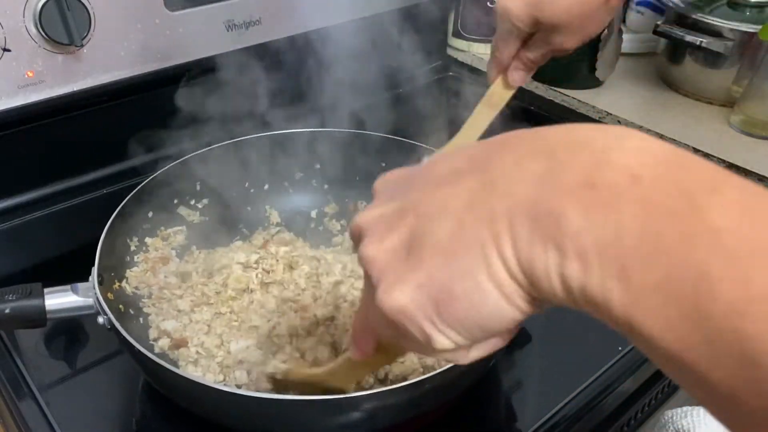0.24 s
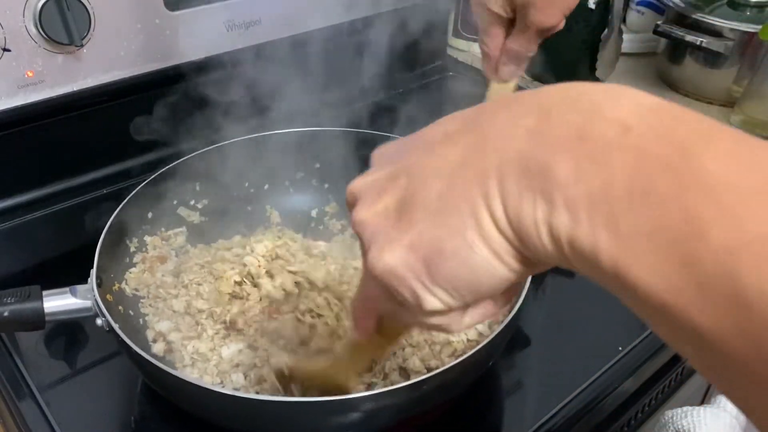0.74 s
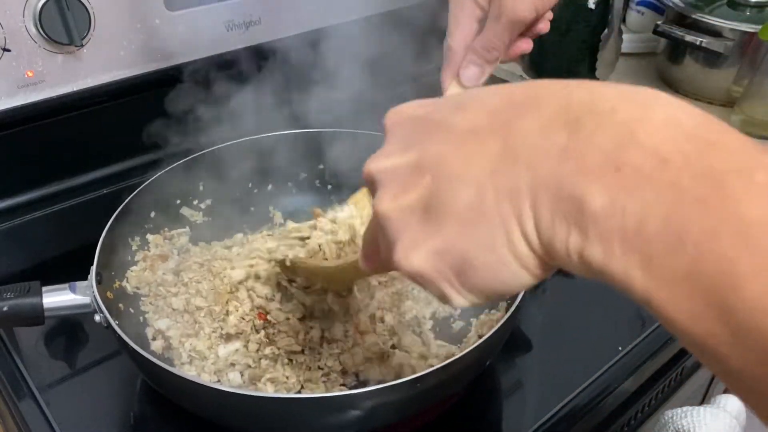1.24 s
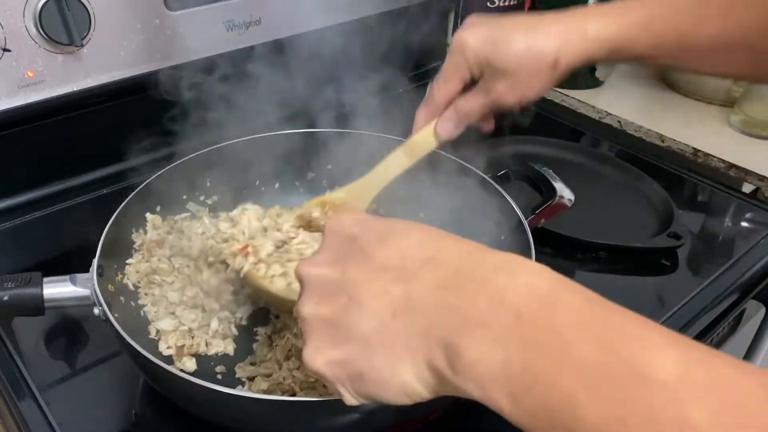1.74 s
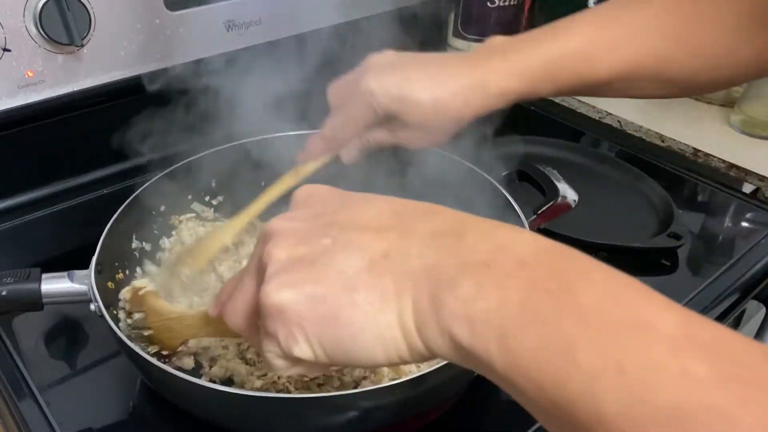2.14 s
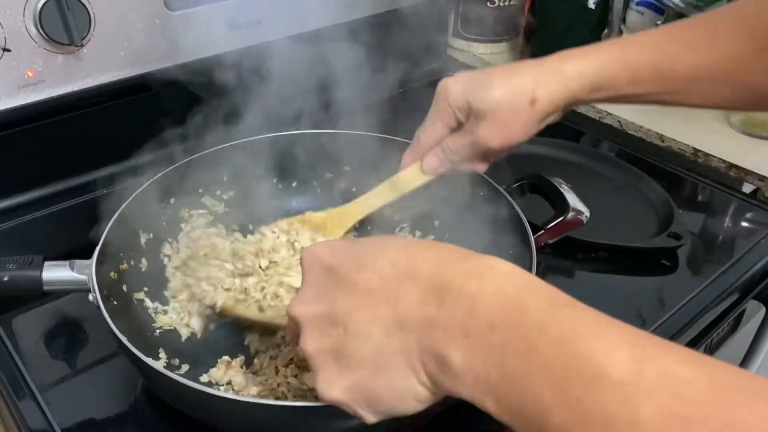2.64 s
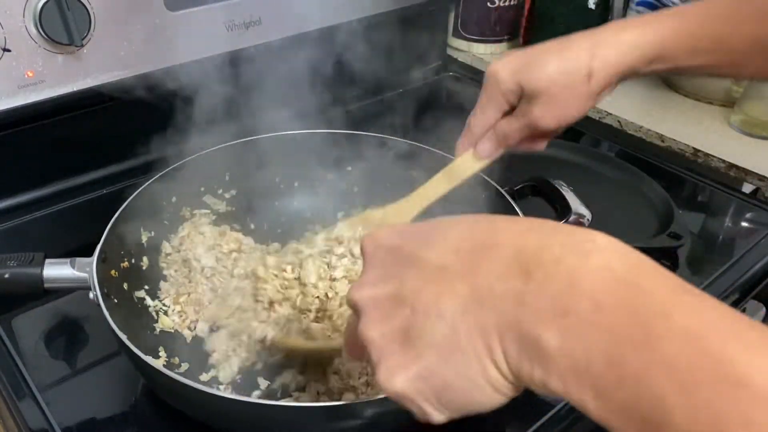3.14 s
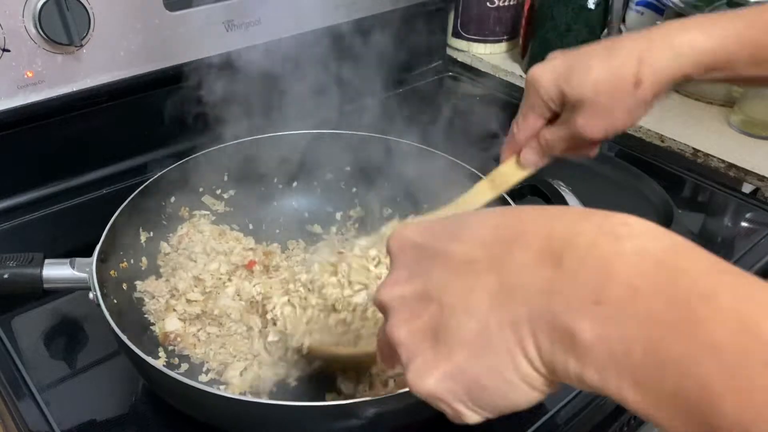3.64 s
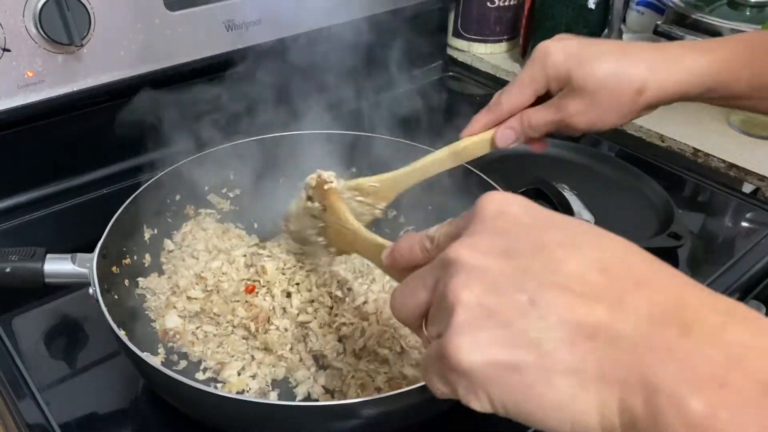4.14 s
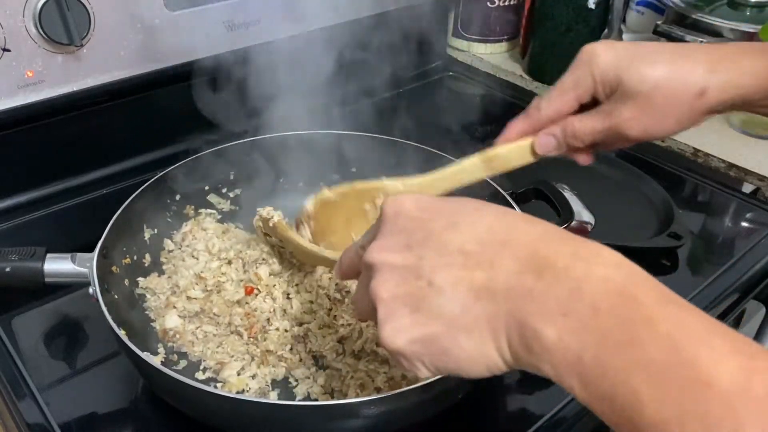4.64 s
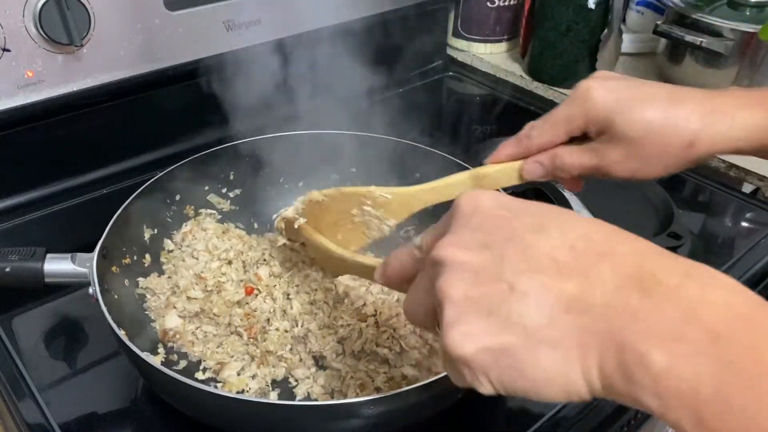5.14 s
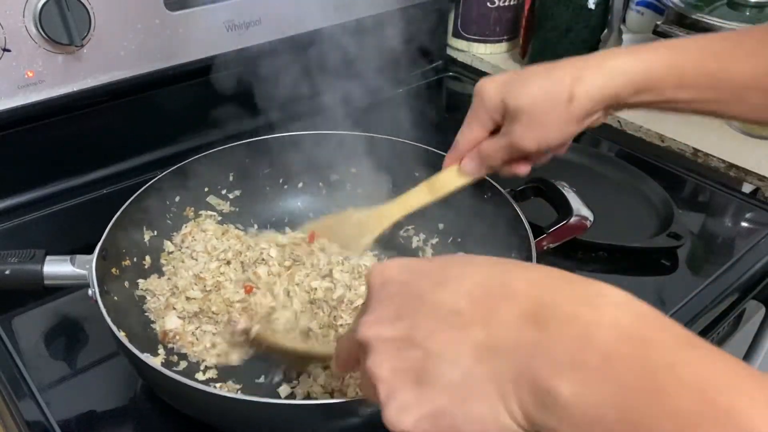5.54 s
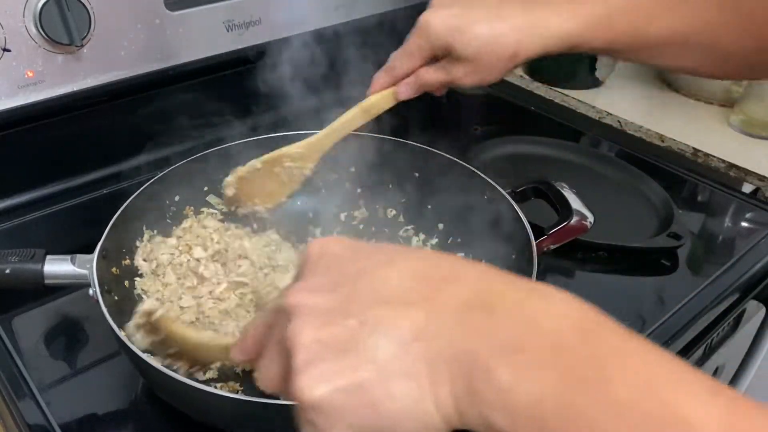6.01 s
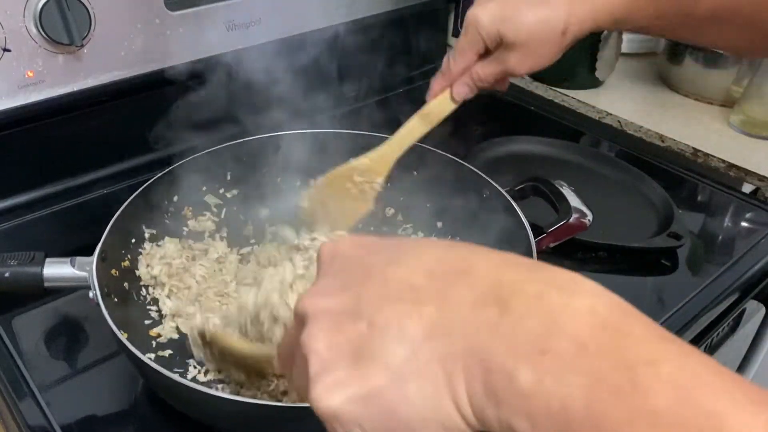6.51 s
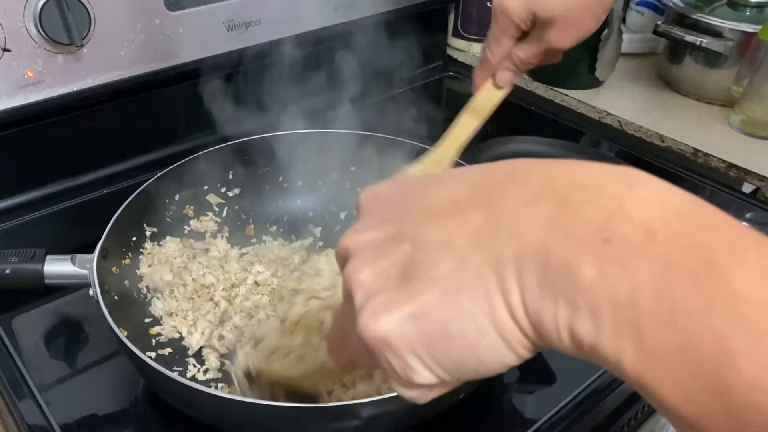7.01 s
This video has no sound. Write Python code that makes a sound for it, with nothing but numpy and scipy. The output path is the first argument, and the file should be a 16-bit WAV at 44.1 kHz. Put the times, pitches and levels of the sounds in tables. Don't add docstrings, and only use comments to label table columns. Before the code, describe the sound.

Shredded meat fries with a dense steady sizzle in a wide pan while two wooden spatulas knock on the metal, each push making the fizz swell.

```python
import sys
import numpy as np
from scipy import signal
from scipy.fft import rfft, irfft, next_fast_len
from scipy.io import wavfile
from scipy.ndimage import uniform_filter1d

SR = 44100
rng = np.random.default_rng(int(sys.argv[2]) if len(sys.argv) > 2 else 0)


def volts_from_decibels(level):
    exponent = np.asarray(level, float) / 20
    return 10 ** exponent


def master_out(mix):
    frames = np.transpose(np.atleast_2d(mix))
    ceiling = np.clip(frames, -1, 1)
    pcm = np.round(ceiling * 32767).astype(np.int16)
    wavfile.write(sys.argv[1], SR, pcm)


N = 320586
SIZE = next_fast_len(N + SR)
HZ = np.arange(SIZE // 2 + 1) * SR / SIZE

# [start_s, simmer_db, spray_over_simmer_db]
SIMMER = [(0, -52.5, -1), (.15, -46, -5), (.6, -46.5, -4), (1.25, -46.5, -11.5), (1.75, -50, -3),
          (2.05, -49.5, -11), (2.75, -50.5, -4), (3.3, -53, -0.5), (3.75, -51, -2), (4.0, -47, -8),
          (4.6, -46.5, -9), (5.3, -46.5, -7.5), (5.7, -51.5, 0.5), (6.05, -47.5, -6), (6.42, -47, -10),
          (6.8, -53.5, -2.5), (6.95, -48, -3.5), (7.27, -50, -1.5)]
# [peak_s, swell_db, length_s, extra_spray_db]
STROKES = [(0.177, 3, 0.084, -3.5), (0.351, 8.5, 0.11, -2.5), (0.675, 4, 0.045, -1.5), (0.973, 7, .2, 1.5),
           (1.48, 9, 0.2, -4), (1.87, 2.5, 0.084, -1), (2.17, 10, 0.22, 0), (2.535, 7.5, 0.17, -5),
           (2.976, 6.5, 0.042, -3), (3.076, 10.5, 0.16, -5), (3.466, 7.5, 0.052, -3.5),
           (3.605, 12.5, 0.2, -8.5), (3.89, 4, 0.14, 0), (4.428, 3, 0.042, 0), (5.497, 14, .13, -7.5),
           (5.9, 4.5, .1, -1), (6.125, 8, .14, -1), (6.58, 12, 0.15, -3.5), (7.094, 9, .2, -4.5)]
# [freq_hz, level_db]
FIZZ_SPECTRUM = [(300, -36), (900, -11), (1500, -1), (2200, 1), (3000, -1.5), (5000, -2), (7000, -7),
                 (9000, -13.5)]
SPRAY_SPECTRUM = [(5000, -7), (7500, 0), (9500, 2.5), (11000, -3), (12500, -14), (14500, -4.5),
                  (16000, -7.5)]
SCRAPE_SPECTRUM = [(120, -20), (300, -4.5), (520, -6), (700, -1), (1100, -7), (1600, -3.5), (3000, -53)]
RUMBLE_SPECTRUM = [(25, -29), (45, -4), (64, 0), (100, 0), (160, -8), (250, -15.5), (500, -31)]
STEAM_SPECTRUM = [(8000, -30), (10000, -14), (12300, -14), (14000, -2), (16000, -3)]
# [start_s, level_db, pitch_hz]
SPITS = [(0.082, -35.5, 1530), (0.315, -43, 1530), (1.441, -29, 2460), (1.966, -42, 2040),
         (2.885, -39, 1500), (2.9693, -38, 1830), (3.5164, -44, 1650), (3.5463, -39, 2280),
         (3.5708, -30, 6040), (4.2894, -36, 2220), (4.3862, -33, 1470), (4.5997, -38, 3580),
         (4.6522, -27, 2240), (4.673, -35, 1440), (4.7164, -32, 1600), (4.7187, -30.5, 5500),
         (4.7596, -31, 5030), (4.7994, -38, 4000), (4.8521, -30, 1630), (4.856, -32, 1700),
         (4.8755, -33, 6500), (4.8882, -33, 2240), (5.1267, -31.5, 1950), (5.139, -40, 2100),
         (5.2828, -35, 1450), (6.5534, -29, 1220), (6.8418, -48, 1620)]
# [start_s, rim_db, rim_pitch_hz, crack_over_rim_db]
KNOCKS = [(.2, -26.5, 1900, -3.5), (.206, -26.5, 995, -30), (.724, -23, 840, -3.5), (.824, -49, 931, -13),
          (1.031, -53, 1210, -9), (1.382, -44.5, 1473, 0), (2.042, -31.5, 990, -6), (2.116, -42, 1470, -1),
          (2.409, -33, 1410, -17), (2.43, -23, 1980, 1.5), (2.635, -34.5, 1140, -10),
          (5.344, -15.5, 1030, -5.5), (5.385, -15.5, 1110, -10.5), (6.073, -23, 1340, -4.5),
          (6.216, -46, 1180, 3), (6.339, -32, 724, -5), (6.499, -29.5, 1390, -6), (7.002, -16.5, 1075, -6),
          (7.089, -31, 1180, -23)]
# [start_s, level_db, pitch_hz]
TAPS = [(.2, -32, 738), (.335, -35, 190), (1.387, -37, 470), (.73, -45, 850), (2.43, -20.5, 600),
        (5.387, -18.5, 1230), (6.499, -23.5, 420), (.824, -32.5, 414), (2.042, -42, 790),
        (2.409, -37, 1360), (2.635, -30.5, 1140), (2.636, -32.5, 600), (6.339, -37, 900), (3.99, -44, 342),
        (5.346, -31, 1740), (7.003, -27, 1620), (7.005, -21.5, 1030), (7.09, -32, 900), (3.456, -37, 716),
        (3.502, -38.5, 420), (3.503, -38, 720), (3.516, -33.5, 1800), (3.668, -38.5, 800),
        (4.227, -43.5, 413), (4.963, -44.5, 452), (6.007, -41.5, 160), (6.008, -42.5, 330)]
# [start_s, bottom_db, wall_over_bottom_db, wall_pitch_hz, hob_over_bottom_db]
THUMPS = [(.204, -28.5, -1, 600, -11), (.263, -28.5, -5, 290, -16), (0.726, -28, -1, 500, -12.5),
          (0.823, -30, -7.5, 290, -14), (1.031, -31.5, -7.5, 362, -13.5), (1.376, -29.5, -7.5, 415, -8),
          (2.042, -22.5, -6, 350, -19), (2.113, -28.5, -11, 352, -17), (2.408, -23, -7.5, 334, -19.5),
          (2.43, -25, -0.5, 450, -28), (2.635, -24, -4, 328, -15), (3.002, -43.5, -20, 336, -4.5),
          (3.314, -43.5, -9, 325, -7), (3.505, -41, -1, 477, -4.5), (3.914, -50.5, -1, 478, 5),
          (5.344, -26, -3, 493, -4.5), (5.386, -23.5, 1, 331, -16), (6.074, -13.5, -6.5, 344, -19),
          (6.215, -30, -0.5, 342, -8.5), (6.34, -23, -1.5, 333, -16.5), (6.361, -40, -21, 361, -31),
          (6.498, -32.5, 11, 450, -12), (7, -23.5, -1, 474, -11), (7.09, -25.5, -1, 328, -10)]
# [freq_hz, level_db, t60_s]
RIM_MODES = [(735, -5, 0.036), (820, 4, 0.056), (900, 6, 0.04), (1006, -1.5, 0.11), (1116, 3.5, 0.031),
             (1234, -1, 0.07), (1360, -29, 0.044), (1746, -1, 0.071), (2120, -9, 0.054), (2007, 9, 0.039),
             (2613, 7, 0.063), (3330, -11, .04), (4560, 3, 0.03)]
WALL_MODES = [(290, -7, 0.16), (331, -6, 0.19), (361, -3.5, 0.17), (424, -2.5, 0.08), (475, -3.5, 0.14),
              (555, -1.5, 0.13), (630, 5.5, 0.029)]
BOTTOM_MODES = [(134, -8.5, 0.15), (152.2, -7.5, 0.16), (163.4, -0.5, 0.14), (181.4, -4, 0.076),
                (208.7, -5.5, 0.2), (250, -14.5, 0.16)]
HOB_MODES = [(64.4, -5.5, 0.44), (98, 0.5, 0.12), (81, -6.5, 0.18)]
# [freq_hz, level_db]
CLACK_SPECTRUM = [(250, -7), (500, 10), (1000, -19), (1500, 10), (2500, -36), (5000, -63)]
CRACK_SPECTRUM = [(500, -3), (1000, 10), (1350, -7.5), (2000, 5.5), (3200, -3.5), (5000, -3), (8000, -18.5),
                  (15000, -31)]
THUD_SPECTRUM = [(120, -34), (280, 6), (500, 8), (700, -2), (1400, -66)]
# [freq_hz, share_heard_alike_0_to_1, left_minus_right_db]
PORTS = [(60, 0.97, 0.5), (177, 0.95, 1.5), (400, 0.64, -3), (600, 0.25, 3.5), (1250, 0.51, 2),
         (2460, 0.2, 3), (4000, 0, 4.5), (5840, 0.41, 7), (7100, 0.26, 1.5), (8040, 0.7, 0.5),
         (12800, 1, -1), (16000, 0.4, 1)]
# [freq_hz, left_lead_rad]
PORT_LEAD = [(0, 0), (1300, .1), (2800, 2.1), (4300, -.5), (6700, 0), (8430, -np.pi), (15690, -5 * np.pi),
             (22050, -8.5 * np.pi)]


def on_hz(hz, values):
    return np.interp(np.log(HZ + 1), np.log(hz), values)


def colour(x, spectrum):
    gain = volts_from_decibels(on_hz(*np.transpose(spectrum)))
    y = irfft(rfft(x, SIZE) * gain, SIZE)[..., :N]
    return y / np.sqrt(np.mean(y ** 2))


def noise():
    return rng.standard_normal((3, N))


def add(out, start_s, x):
    i = int(start_s * SR)
    out[:, i:i + x.shape[1]] += x[:, :N - i]


def walk(rate_hz):
    hold = int(SR / rate_hz)
    steps = np.repeat(rng.standard_normal(N // hold + 1), hold)
    return 1.47 * uniform_filter1d(uniform_filter1d(steps, hold), hold)[:N]


def bursts(rate_hz, spread_db, hiss):
    when, size = rng.random((2, 3, N))
    pops = (when < rate_hz / SR) * np.sign(noise()) * volts_from_decibels(spread_db * size ** 2)
    return pops / pops.std() + hiss * noise()


def strokes(t, column_db):
    peak_s, length_s = np.array(STROKES)[:, [0, 2]].T[:, :, None]
    width_s = length_s * np.where(t < peak_s, 0.42, 0.71)
    return column_db @ np.exp(-((t - peak_s) / width_s) ** 2)


def aftermath(blow_db, fade_s):
    kicks = np.zeros(N)
    kicks[(np.array(THUMPS)[:, 0] * SR).astype(int)] = volts_from_decibels(blow_db)
    return signal.lfilter([1], [1, -np.exp(-1 / (fade_s * SR))], kicks)


def fizz(simmer_db, swell_db, patchy_db):
    flutter_db = 0.34 * patchy_db + 0.85 * walk(70)
    return colour(bursts(2500, 9.2, 0.97), FIZZ_SPECTRUM) * volts_from_decibels(simmer_db + swell_db + flutter_db + 3.0)


def spray(t, simmer_db, patchy_db):
    start_s, _, over_db = np.transpose(SIMMER)
    _, swell_db, _, extra_db = np.transpose(STROKES)
    late_s = 0.0082
    level_db = simmer_db + np.interp(t, start_s, over_db) + strokes(t - late_s, swell_db + extra_db)
    flutter_db = 1.3 * patchy_db + 0.68 * walk(60)
    return colour(bursts(5000, 11, 0.98), SPRAY_SPECTRUM) * volts_from_decibels(level_db + flutter_db + 4.5)


def scrape(simmer_db, swell_db, patchy_db):
    _, weight_db, wall_db, _, _ = np.transpose(THUMPS)
    drag = volts_from_decibels(-59 + 0.8 * (simmer_db + 46.5) + swell_db)
    drag = drag + aftermath(weight_db + wall_db - 18.5, fade_s=0.034)
    flutter_db = patchy_db + 2 * walk(30)
    return colour(bursts(800, 13, 0.74), SCRAPE_SPECTRUM) * drag * volts_from_decibels(flutter_db + 4.5)


def rumble(swell_db):
    _, weight_db, _, _, hob_db = np.transpose(THUMPS)
    shake = volts_from_decibels(-64 + 0.7 * swell_db) + aftermath(weight_db + hob_db - 15.5, fade_s=0.21)
    return colour(noise(), RUMBLE_SPECTRUM) * shake * volts_from_decibels(1.5 * walk(12) + 1.94)


def frying():
    t = np.arange(N) / SR
    start_s, level_db, _ = np.transpose(SIMMER)
    simmer_db = np.interp(t, start_s, level_db)
    swell_db = strokes(t, np.array(STROKES)[:, 1])
    patchy_db = walk(25)
    steam = colour(noise(), STEAM_SPECTRUM) * volts_from_decibels(-54)
    bubbling = fizz(simmer_db, swell_db, patchy_db) + spray(t, simmer_db, patchy_db)
    return bubbling + scrape(simmer_db, swell_db, patchy_db) + rumble(swell_db) + steam


def spits():
    out, t = np.zeros((3, N)), np.arange(400) / SR
    snap = np.exp(-t / 0.000084) * np.sin(2 * np.pi * 4500 * t)
    for start_s, level_db, pitch_hz in SPITS:
        fade = np.exp(-t * pitch_hz / 0.7) + 0.08 * np.exp(-t / 0.003)
        bubble = fade * np.sin(2 * np.pi * pitch_hz * t)
        add(out, start_s + 0.001, volts_from_decibels(level_db + 2.5) * np.tile(bubble + 1.3 * snap, (3, 1)))
    return signal.sosfilt(signal.butter(2, 900, "high", fs=SR, output="sos"), out)


def near(modes, pitch_hz, db_per_octave):
    return -db_per_octave * np.abs(np.log2(np.array(modes)[:, :1] / pitch_hz))


def ring(modes, tilt_db, build_cycles, chance):
    hz, db, t60_s = np.transpose(modes)[:, :, None]
    t = np.arange(int(t60_s.max() * SR)) / SR
    rise = 1 - np.exp(-(t * hz / build_cycles) ** 2)
    fade = volts_from_decibels(db + tilt_db + 2.5 * chance[:, :1] - 60 * t / t60_s) * rise
    swing = fade * np.exp(2j * np.pi * hz * (1 + 0.02 * chance[:, 1:2]) * t)
    phase_rad = 1.3 * chance[:, 2:].T * [[0], [1], [1]]
    x = (np.exp(1j * phase_rad) @ swing).imag
    return x / np.abs(x[0]).max()


def knocks():
    out, t = np.zeros((3, N)), np.arange(8000) / SR
    clack, crack = colour(noise(), CLACK_SPECTRUM), colour(noise(), CRACK_SPECTRUM)
    clack_fade = (1 - np.exp(-t / 0.00054)) * (np.exp(-t / 0.0051) + 0.16 * np.exp(-t / 0.03))
    crack_fade = (1 - np.exp(-t / 0.000067)) * (1.2 * np.exp(-t / 0.0045) + 0.3 * np.exp(-t / 0.055))
    chance = rng.standard_normal((len(KNOCKS), len(RIM_MODES), 5))
    for k, (start_s, rim_db, pitch_hz, crack_db) in enumerate(KNOCKS):
        fresh = slice(k * len(t), (k + 1) * len(t))
        rim = ring(RIM_MODES, near(RIM_MODES, pitch_hz, 22), 0.79, chance[k])
        add(out, start_s, volts_from_decibels(rim_db - 1.0) * rim)
        add(out, start_s, volts_from_decibels(rim_db - 15) * clack_fade * clack[:, fresh])
        add(out, start_s + 0.0005, volts_from_decibels(rim_db + crack_db - 2) * crack_fade * crack[:, fresh])
    return out


def taps():
    out, t = np.zeros((3, N)), np.arange(3000) / SR
    peak_cycles = 1.7 / 2
    for start_s, level_db, pitch_hz in TAPS:
        cycles = t * pitch_hz
        tap = cycles * np.exp(1 - cycles / peak_cycles) * np.sin(2 * np.pi * cycles)
        add(out, start_s, volts_from_decibels(level_db) * np.tile(tap, (3, 1)))
    return out


def thumps():
    out, t = np.zeros((3, N)), np.arange(8000) / SR
    thud = colour(noise(), THUD_SPECTRUM)
    thud_fade = (1 - np.exp(-t / 0.0022)) * np.exp(-t / 0.03)
    wall_end = len(WALL_MODES)
    bottom_end = wall_end + len(BOTTOM_MODES)
    chance = rng.standard_normal((len(THUMPS), bottom_end + len(HOB_MODES), 5))
    for k, (start_s, db, wall_db, wall_hz, hob_db) in enumerate(THUMPS):
        fresh = slice(k * len(t), (k + 1) * len(t))
        wall = ring(WALL_MODES, near(WALL_MODES, wall_hz, 23.5), 0.89, chance[k, :wall_end])
        bottom_hz = 166 * 345 / wall_hz
        bottom_tilt_db = near(BOTTOM_MODES, bottom_hz, 23.7)
        bottom = ring(BOTTOM_MODES, bottom_tilt_db, 1.74, chance[k, wall_end:bottom_end])
        hob = ring(HOB_MODES, 0, 1.1, chance[k, bottom_end:])
        add(out, start_s, volts_from_decibels(db + wall_db - 3.0) * wall)
        add(out, start_s, volts_from_decibels(db + wall_db - 13) * thud_fade * thud[:, fresh])
        add(out, start_s, volts_from_decibels(db - 4.0) * bottom)
        add(out, start_s + 0.005, volts_from_decibels(db + hob_db + 5.0) * hob)
    return out


def ports(paths):
    hz, alike, pan_db = np.transpose(PORTS)
    alike, pan_db = np.clip(on_hz(hz, alike), 0, 1), on_hz(hz, pan_db)
    lead_rad = np.interp(HZ, *np.transpose(PORT_LEAD))
    side = np.array([[1], [-1]])
    paths = rfft(paths, SIZE)
    direct = np.sqrt(alike) * np.exp(0.5j * side * lead_rad) * paths[0]
    scatter = np.sqrt(1 - alike) * paths[1:]
    return irfft((direct + scatter) * volts_from_decibels(side * pan_db / 2), SIZE)[:, :N]


def kitchen(x):
    t = np.arange(SR // 3) / SR
    band = signal.butter(2, [350, 4000], "band", fs=SR, output="sos")
    grain = signal.sosfilt(band, rng.standard_normal((2, len(t))))
    tail = grain * volts_from_decibels(-60 * t / 0.3) * (t > 0.004)
    return volts_from_decibels(-40) * signal.fftconvolve(x, tail, axes=1)[:, :N]


def scene():
    close = ports(frying() + spits() + knocks() + taps() + thumps())
    return close + kitchen(close)


def roll_off(x):
    return signal.sosfilt(signal.butter(12, 16190, fs=SR, output="sos"), x)


def record(dry):
    cut = signal.sosfilt(signal.butter(2, 54, "high", fs=SR, output="sos"), dry)
    cut = signal.sosfilt(signal.ellip(10, 0.2, 80, 15350, fs=SR, output="sos"), cut)
    return roll_off(cut)


dry = scene()
out = record(dry)
master_out(out)
```